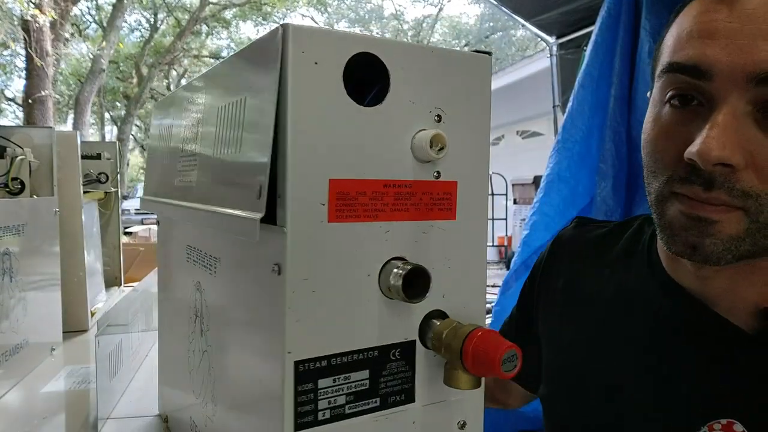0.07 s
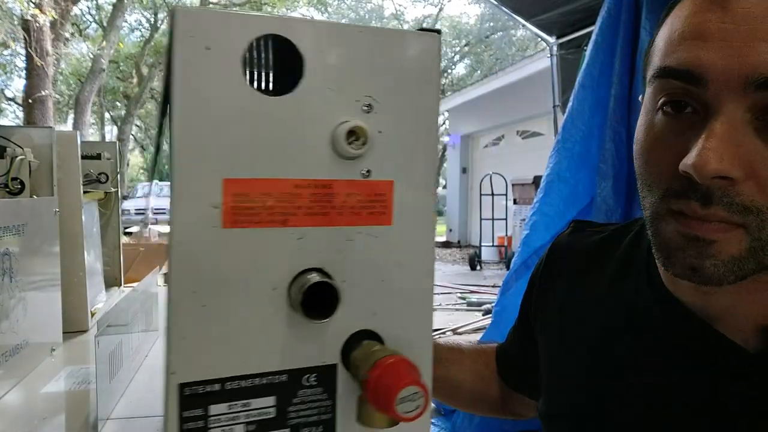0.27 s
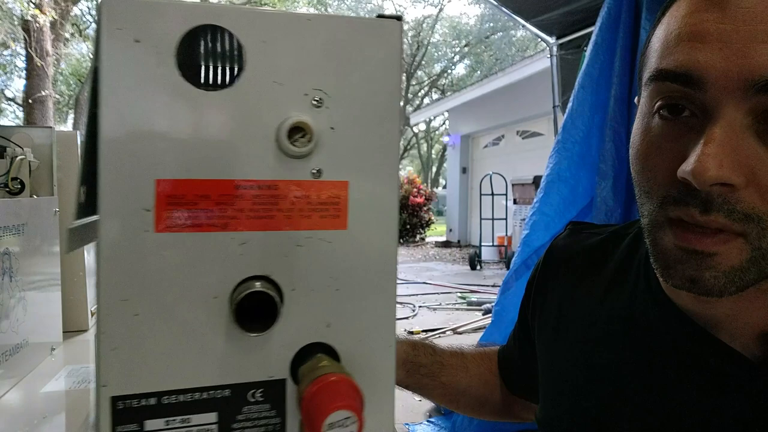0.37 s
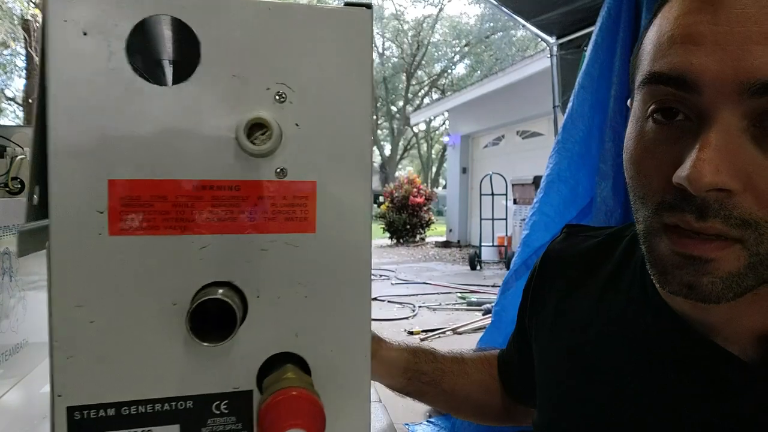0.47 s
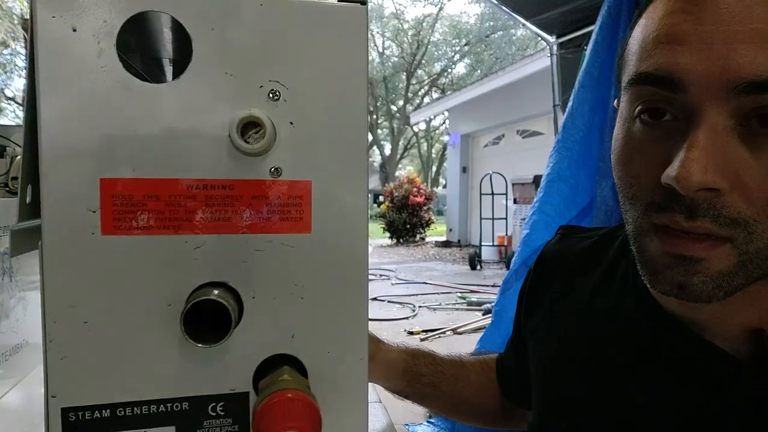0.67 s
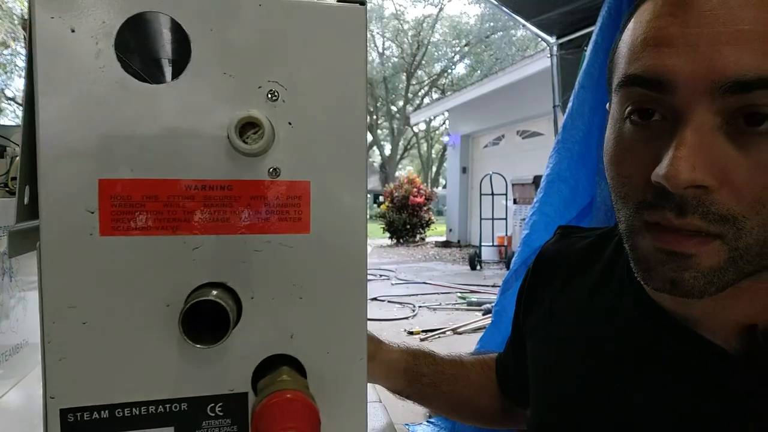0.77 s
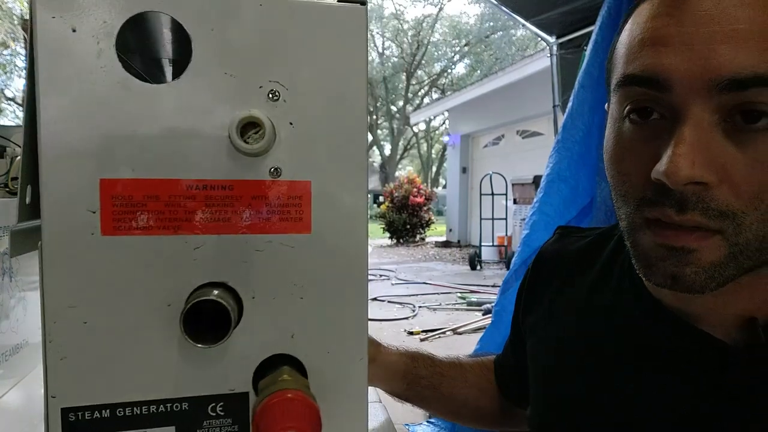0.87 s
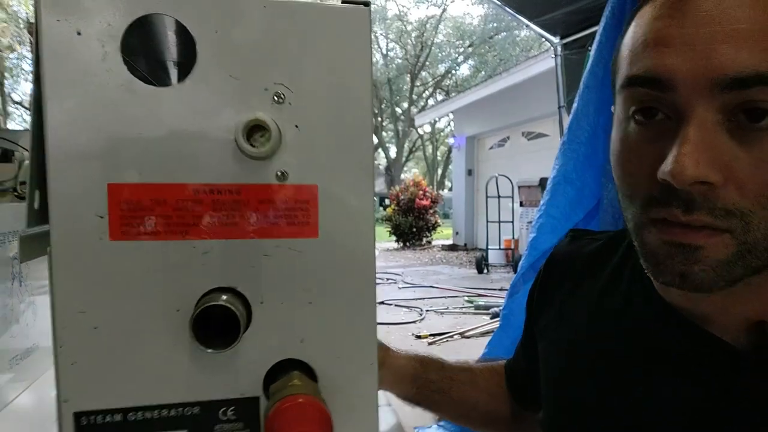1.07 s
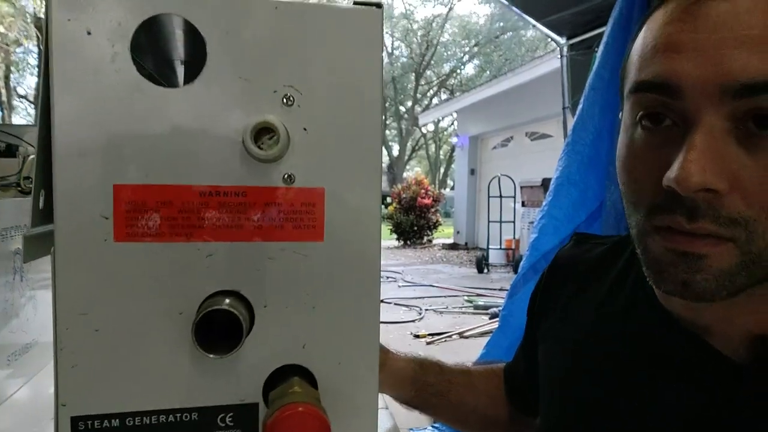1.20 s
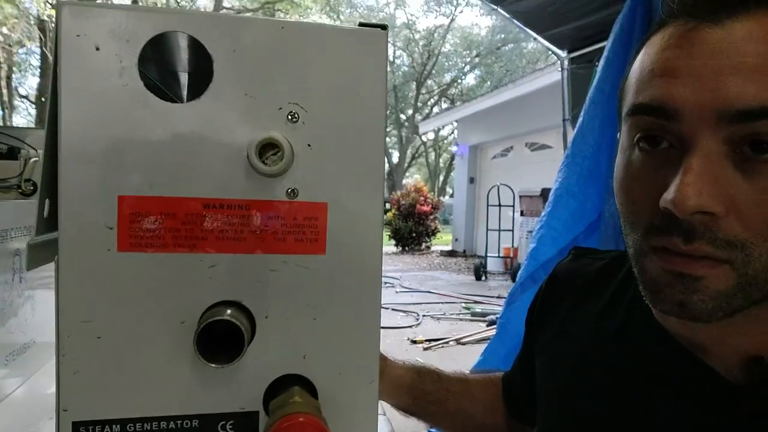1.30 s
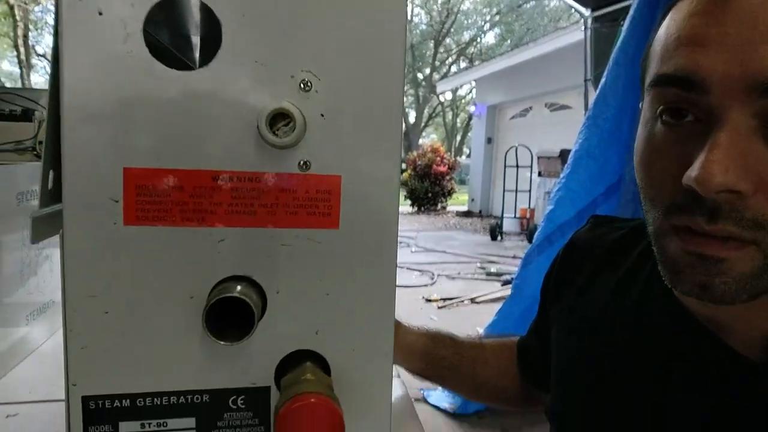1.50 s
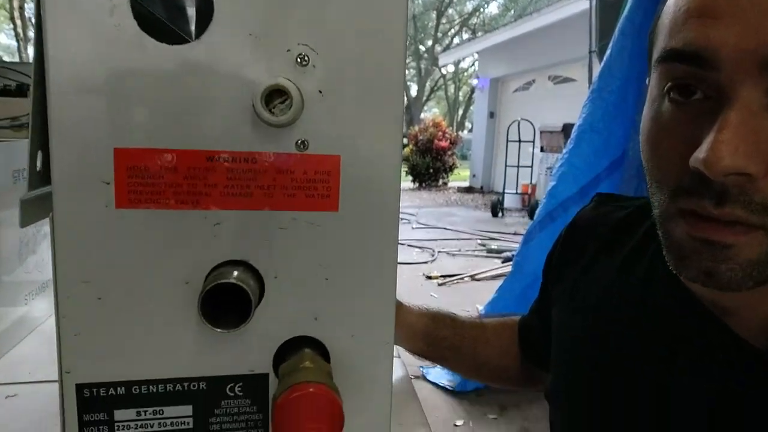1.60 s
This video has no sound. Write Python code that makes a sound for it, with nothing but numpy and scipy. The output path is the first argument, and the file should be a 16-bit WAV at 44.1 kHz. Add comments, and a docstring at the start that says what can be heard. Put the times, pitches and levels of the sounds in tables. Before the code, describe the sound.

Scuffing, rumbling drag of a metal appliance, followed by hollow watery gulps and a single soft knock

```python
"""Under an open shelter, a sheet-metal cabinet with a small water tank inside is turned on a table.
Its base scuffs and rumbles over the top as many small slips shake body, panels and edge; a foot squeals.
Bubbles gulp and ring the tank's modes, and a corner knocks down on the cabinet's modes before it settles.
Small dry ticks are noise bursts. Below lie faint outdoor air, as shaped noise, and narrow bands of
distant chirring; the roof and walls add a short dull tail to the water and the knock."""
import sys
import numpy as np
from scipy import signal
from scipy.fft import rfft, irfft
from scipy.io import wavfile
from scipy.ndimage import uniform_filter1d

SR = 44100
rng = np.random.default_rng(int(sys.argv[2]) if len(sys.argv) > 2 else 0)


def boost(x):
    """Linear amplitude factor 10**(x/20) for a level x in decibels (scalar or array-like)."""
    u = np.asarray(x, float) / 20
    return 10 ** u


def output_pcm(signal):
    """Save a mono or channel-first signal as 16-bit PCM at the path in sys.argv[1].

    Samples are clipped to [-1, 1] before scaling.
    """
    pcm = np.clip(np.atleast_2d(signal).T, -1, 1) * 32767
    wavfile.write(sys.argv[1], SR, np.round(pcm).astype(np.int16))


N = 72765
TIME = np.arange(N) / SR
BIN_HZ = np.arange(N // 2 + 1) * SR / N + 1  # kept above zero for the logarithm

# spectrum of the scuffing hiss, in the drag and after the knock: (frequency [Hz], density [dB per Hz])
HISS_SPECTRUM = [(1880, -2), (3200, -4.5), (4840, -5), (6330, -5), (7380, -7.5), (10300, -9), (14900, -18),
                 (15800, -34)]


def rms_one(x):
    """Scales a signal to an rms of 1."""
    return x / np.sqrt(np.mean(x ** 2) + 1e-20)


def in_time(rows):
    """Draws straight lines through rows of (time [s], values ..), one curve for each value."""
    s, *columns = np.transpose(rows)
    return [np.interp(TIME, s, column) for column in columns]


def at_hz(points, hz):
    """Reads a curve of (frequency [Hz], value) along a logarithmic frequency axis."""
    points = np.array(points)
    return np.interp(np.log(hz), np.log(points[:, 0]), points[:, 1])


def resonate(x, hz, width):
    """A damped two-pole resonance, with a gain of about 1 at its peak."""
    r = np.exp(-np.pi * width / SR)
    top = [(1 - r * r) / 2, 0, (r * r - 1) / 2]
    bottom = [1, -2 * r * np.cos(2 * np.pi * hz / SR), r * r]
    return signal.lfilter(top, bottom, x + 1e-18)


def band_noise(hz, width):
    """Stereo noise through the same resonance twice, at an rms of 1."""
    noise = rng.standard_normal((2, N))
    return rms_one(resonate(resonate(noise, hz, width), hz, width))


def coloured(x, points):
    """Shapes noise by a spectrum in dB per Hz."""
    return irfft(rfft(x) * boost(at_hz(points, BIN_HZ)), N)


def unevenness(length_s):
    """Slow random wandering of rms 1: noise averaged twice over a short length."""
    span = int(length_s * SR)
    return rms_one(uniform_filter1d(uniform_filter1d(rng.standard_normal(N), span), span))


def spread(pair, alike):
    """Two signals become left and right, tilted and lagged by the cabinet's place to one side."""
    # left over right at the microphones: (frequency [Hz], level difference [dB])
    left_over_right = [(200, -1.2), (700, -0.2), (1500, 0), (5000, 4.5), (8000, -2), (15000, -10.5)]
    left_lead_s = .00009
    alike = np.clip(alike, 0, 1)
    shared, opposed = np.sqrt(1 + alike) * pair[0], np.sqrt(1 - alike) * pair[1]
    both = (shared + opposed * [[1], [-1]]) / np.sqrt(2)
    side = np.array([[.5], [-.5]])
    tilt = boost(side * at_hz(left_over_right, BIN_HZ))
    lag = np.exp(2j * np.pi * BIN_HZ * side * left_lead_s)
    return irfft(rfft(both) * tilt * lag, N)


def glide(s, length, from_hz, to_hz, db):
    """A short tone that swells, slides in pitch and fades."""
    u = np.clip((TIME - s) / length, 0, 1)
    cycles = length * (from_hz * u + (to_hz - from_hz) * u * u / 2)
    return boost(db) * np.sin(np.pi * u) * np.sin(2 * np.pi * cycles)


def outdoors():
    """Smooth air noise, wider in the treble, and three distant chirring bands that come and go."""
    # open air at the microphones: (frequency [Hz], relative density [dB per Hz])
    air_spectrum = [(15, -63), (25, 3.5), (165, -9.5), (261, -11), (403, -16.5), (557, -15), (1550, -25),
                    (2200, -31.5), (15800, -38)]
    # (frequency [Hz], left-right likeness [0-1])
    air_alike = [(60, 0.98), (300, 0.28), (1000, 0.3), (4000, .02)]
    # distant chirring: (centre [Hz], width [Hz])
    chirr_bands = [(2340, 320), (3930, 330), (4700, 300)]
    # (time [s], level of each band before its patches [dB] x 3)
    chirr_levels = [(.62, -99, -71, -99), (.73, -92, -71, -71), (.86, -84, -80, -101),
                    (1.05, -97, -94, -77.5), (1.085, -98, -94, -95), (1.097, -70, -70, -72),
                    (1.22, -72.5, -89, -105), (1.3, -69.5, -94, -86), (1.39, -77, -85.5, -99),
                    (1.561, -75, -91, -91), (1.65, -84, -99, -99)]
    air_db = -64.5
    patchy_db, patch_s = 3.5, 0.015

    mid, side = coloured(rng.standard_normal((2, N)), air_spectrum)
    alike = np.clip(at_hz(air_alike, BIN_HZ), 0, 1)
    mid = irfft(rfft(mid) * np.sqrt(1 + alike), N)
    side = irfft(rfft(side) * np.sqrt(1 - alike), N)
    out = boost(air_db) * rms_one(mid + side * [[1], [-1]])
    for (hz, width), db in zip(chirr_bands, in_time(chirr_levels)):
        out = out + boost(db + patchy_db * unevenness(patch_s)) * band_noise(hz, width)
    return out


def shelter(x):
    """A short dull tail from roof and walls: decaying noise, its own on each side."""
    t60_s, tail_db = .25, -17
    t = np.arange(N // 3) / SR
    dull = signal.lfilter([.3], [1, -.7], rng.standard_normal((2, len(t))))
    tail = dull * boost(-60 * t / t60_s) * (t > .004)  # nothing returns in the first 4 ms
    tail = tail / np.sqrt(np.sum(tail ** 2) / 2)
    return boost(tail_db) * signal.fftconvolve(x[None], tail, axes=1)[:, :N]


def ticks():
    """Small dry ticks, the last on the knock: dying bursts of noise from a wide resonance."""
    # start of each tick: [s]
    tick_times = [.995, 1.1322]
    # each tick: (level [dB], centre [Hz], width [Hz], t60 [s])
    tick_sounds = [(-58, 10500, 2500, .006), (-48, 5000, 4000, .01)]
    out = 0
    for s, (db, hz, width, t60) in zip(tick_times, tick_sounds):
        decay = (TIME > s) * boost(db - 60 * np.maximum(TIME - s, 0) / t60)
        out = out + spread(band_noise(hz, width) * decay, alike=0.18)
    return out


def gulps():
    """A bubble sets three modes of the tank ringing, lowest first; each mode beats with a twin."""
    # gulps: (time [s], low mode [dB], middle mode [dB], high mode [dB], delay from mode to mode [s])
    gulp_rows = [(.708, -67, -59, -77, 0.0007), (.7635, -59, -57, -75, 0.001),
                 (0.8065, -44, -41, -49, .009), (0.92, -45.5, -52, -43.5, 0.0011),
                 (1.0897, -41, -46, -60, .0012)]
    # the water level shifts the modes, higher ones more: pitch ratio for each gulp
    pitch_ratios = [1.0, 1.0, 1.0, 1.002, .988]
    # modes of the tank: (frequency [Hz], t60 [s], twin above it by [Hz], twin relative level [dB])
    tank_modes = [(952.5, 0.26, 11.6, -20), (1104, .14, 31.3, -7), (1303, 0.12, 25, -8)]
    # a bubble gliding up: (time [s], length [s], from [Hz], to [Hz], level [dB])
    bubbles = [(.794, .04, 680, 1450, -50)]
    rise_s = .003
    pop_db, pop_t60_s = -6, .04  # the bubble's own short, thick pop, relative to each mode

    out = sum(glide(*row) for row in bubbles)
    for (s, *dbs, step_s), ratio in zip(gulp_rows, pitch_ratios):
        for k, ((hz, t60, twin_hz, twin_db), db) in enumerate(zip(tank_modes, dbs)):
            t = np.maximum(TIME - s - k * step_s, 0)
            shifted = hz * ratio ** (k + 1)
            twin = boost(twin_db) * np.sin(2 * np.pi * (shifted + twin_hz) * t)
            pair = np.sin(2 * np.pi * shifted * t) + twin
            decay = boost(-60 * t / t60) + boost(pop_db - 60 * t / pop_t60_s)
            rise = (1 - np.exp(-t / rise_s)) ** 2
            out += boost(db) * decay * rise * pair
    return out


def squeak():
    """One foot squeals twice with rising pitch, roughened by slow noise."""
    # squeals: (time [s], length [s], from [Hz], to [Hz], level [dB])
    squeals = [(.257, .024, 2650, 3000, -41), (.278, .016, 2950, 3500, -38.5)]
    ragged_hz, ragged_depth = 250, .5  # how fast and how deep the squeal breaks up
    lowpass = signal.butter(2, ragged_hz, fs=SR, output="sos")
    slow = rms_one(signal.sosfilt(lowpass, rng.standard_normal((2, N))))
    tone = sum(glide(*row) for row in squeals)
    return spread(tone * (1 + ragged_depth * slow), alike=0.81)


def knock():
    """A corner meets the table with a soft contact: the cabinet's modes, a snap and a dying hiss."""
    # blows on the table: (time [s], level [dB])
    blow_rows = [(1.1312, -33), (1.172, -53), (1.266, -56.5)]
    # modes of the cabinet: (frequency [Hz], relative level [dB], t60 [s])
    cabinet_modes = [(70.6, -14, 0.35), (129, -11, 0.14), (187, -8, 0.27), (245, -13, 0.09),
                     (307, -11, 0.12), (400, 1, 0.025), (440, -6, 0.17), (480, -8, 0.08), (560, -15, 0.15),
                     (1600, 0, 0.008), (2320, -14, 0.05)]
    # the edge snaps, treble first: (time [s], length [s], from [Hz], to [Hz], level [dB])
    snap = (1.1303, .0009, 13500, 6000, -36)
    contact_s = .00045
    rattle_db, rattle_t60_s = -39, .2  # loose panels keep shaking the modes after a blow
    hiss_db, hiss_t60_s = -52, 0.13

    blows = np.zeros(N)
    for s, db in blow_rows:
        blows[int(s * SR)] = boost(db)
    contact = np.hanning(int(contact_s * SR) + 3)
    blows = signal.fftconvolve(blows, contact)[:N] * 2 / (contact_s * SR + 2)
    shake_decay = boost(rattle_db - 60 * np.arange(N // 4) / SR / rattle_t60_s)
    shake = shake_decay * rng.standard_normal(N // 4)
    blows = blows + signal.fftconvolve(blows, shake)[:N]

    body = 0
    for hz, db, t60 in cabinet_modes:
        r, w = boost(-60 / (t60 * SR)), 2 * np.pi * hz / SR
        top, bottom = [0, boost(db) * np.sin(w)], [1, -2 * r * np.cos(w), r * r]
        body = body - signal.lfilter(top, bottom, blows + 1e-18)

    t = TIME - blow_rows[0][0]
    hiss = rms_one(coloured(rng.standard_normal((2, N)), HISS_SPECTRUM))
    hiss = hiss * (t > 0) * boost(hiss_db - 60 * np.abs(t) / hiss_t60_s)
    crack = np.tile(glide(*snap), (2, 1))  # one pulse fed twice, so "alike" only weights the sides
    return body, spread(hiss, alike=0.11) + spread(crack, alike=0.48)


def drag():
    """Dense uneven slips of the base over the table shake the low body, the panels and the edge, and hiss."""
    # the turn: (time [s], boom [dB], rumble [dB], panel ring [dB], edge scratch [dB], hiss [dB])
    turning = [(0, -56, -50, -56, -92, -63.5), (0.081, -64, -67.5, -71, -68, -60.5),
               (0.217, -51, -49.5, -55.5, -51.5, -48.5), (0.247, -56, -39.5, -55, -49, -42.5),
               (0.273, -45.5, -42.5, -43, -43, -45.5), (.305, -39, -42, -43, -45.5, -41),
               (.35, -37.5, -42.5, -45, -41.5, -43.5), (0.397, -37.5, -38.5, -41, -44, -42.5),
               (0.428, -35, -35, -36.5, -34, -36), (0.482, -38.5, -28, -31.5, -31.5, -35.5),
               (0.508, -35, -30.5, -45, -42.5, -38), (0.549, -34, -40.5, -38, -40.5, -37.5),
               (0.595, -39, -47.5, -47.5, -48, -50), (0.652, -49, -67, -61, -60, -64),
               (0.699, -59.5, -83, -72.5, -72.5, -67.5)]
    # then it rocks a little, and settles after the knock: same columns
    settling = [(.78, -62.5, -74.5, -67, -77, -68), (.885, -63, -70, -69.5, -82, -73.5),
                (.93, -58, -72.5, -63, -84, -73), (.99, -61, -64, -89, -74, -75.5),
                (1.099, -73, -91, -70, -109, -74.5), (1.146, -45, -49, -57, -61, -69),
                (1.23, -54, -64.5, -85, -81, -73.5), (1.275, -66, -64.5, -72.5, -67, -68.5),
                (1.36, -67, -70.5, -91, -79.5, -81), (1.65, -77, -91, -100, -98, -99)]
    # resonances of the low body, panels and edge: (frequency [Hz], width [Hz], relative level [dB])
    boom = [(60, 44, -7.5), (119.3, 11.5, 0), (148.2, 21.5, -2), (203.8, 46, 1)]
    rumble = [(249.6, 44, -0.5), (301.4, 20.3, 1.5), (335, 20.7, -1), (409, 16, -3), (496, 68, -6)]
    panel = [(601, 153, -2), (830, 68, -1), (994, 62, -3), (1166, 87, -2.5), (1382, 210, 1)]
    edge = [(1730, 450, -2), (1960, 200, 2.5), (2165, 87, 2.5), (2376, 230, 1), (2830, 205, -1),
            (3300, 720, -6.5)]
    # left-right likeness of boom, rumble, panel, edge, hiss: [0-1]
    likeness = [0.88, 0.72, 0.5, 0.4, 0.02]
    # the feet grab and let go unevenly, least felt in the hiss: depth for each layer [dB]
    judder_depths = [1.2, 1.5, 1.7, 1.5, .3]
    judder_s = .003
    boom_slips_per_s, slip_spread_db = 1500, 3

    def shaken(slips, modes):
        """Slips ring a layer's resonances, with alternating sign."""
        total = 0
        for j, (hz, width, db) in enumerate(modes):
            total = total + (-1) ** j * boost(db) / np.sqrt(width) * resonate(slips, hz, width)
        return total

    out = 0
    judder = unevenness(judder_s)
    layers = [boom, rumble, panel, edge, None]  # the last is the hiss
    levels = in_time(list(turning) + list(settling))
    for k, (modes, level_db, alike) in enumerate(zip(layers, levels, likeness)):
        chance = boom_slips_per_s * 2.5 ** k / SR  # each higher layer slips 2.5 times as often
        slips = (rng.random((2, N)) < chance) * rng.choice([-1, 1], (2, N))
        strength_db = slip_spread_db * np.minimum(rng.exponential(1, (2, N)), 5)
        slips = slips * boost(judder_depths[k] * judder + strength_db)
        moving = slips * boost(level_db)
        if modes is None:
            steady, layer = coloured(slips, HISS_SPECTRUM), coloured(moving, HISS_SPECTRUM)
        else:
            steady, layer = shaken(slips, modes), shaken(moving, modes)
        out = out + spread(layer / np.sqrt(np.mean(steady ** 2)), alike)
    return out


def scene():
    """Water and knock, slightly stronger on the right, with their tail, over the other layers."""
    water = gulps()
    body, crack = knock()
    near = water * boost(np.array([[-.3], [.3]])) + body * boost(np.array([[-.7], [.7]]))
    return near + crack + shelter(water + body) + ticks() + drag() + squeak() + outdoors()


def band_limit(x):
    """A steep low-pass at the top of the band."""
    return signal.sosfilt(signal.butter(12, 16330, fs=SR, output="sos"), x)


def record(dry):
    """The microphones drop the deep bass."""
    mic_cut_hz = 96.4
    highpass = signal.butter(2, mic_cut_hz, "high", fs=SR, output="sos")
    mix = signal.sosfilt(highpass, dry)
    return band_limit(mix)


dry = scene()
out = record(dry)
output_pcm(out)
```